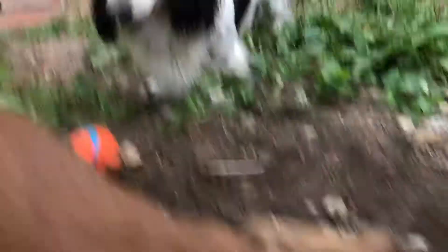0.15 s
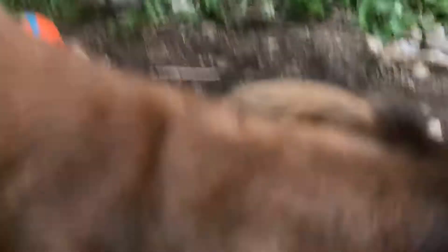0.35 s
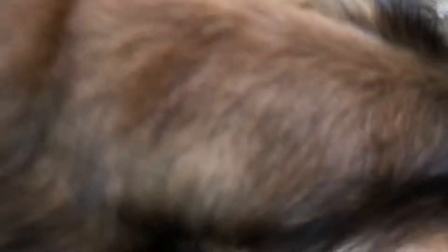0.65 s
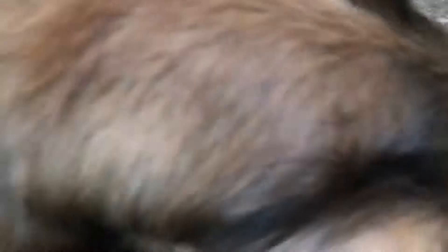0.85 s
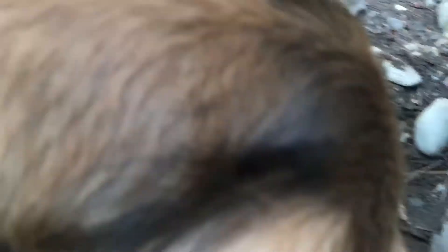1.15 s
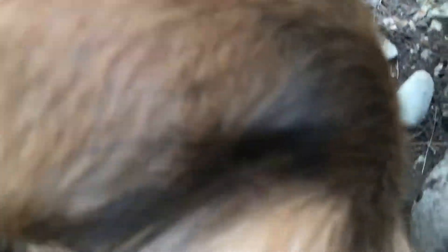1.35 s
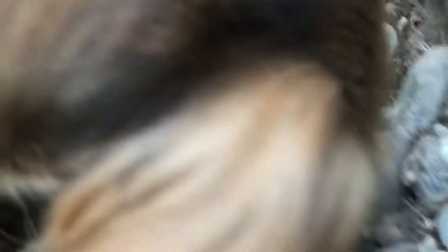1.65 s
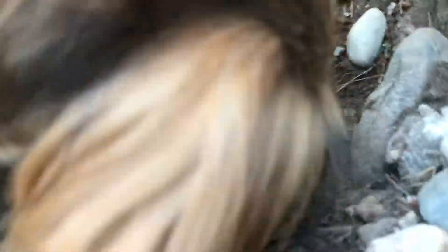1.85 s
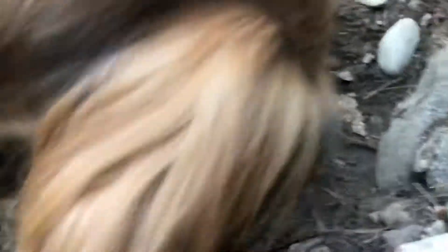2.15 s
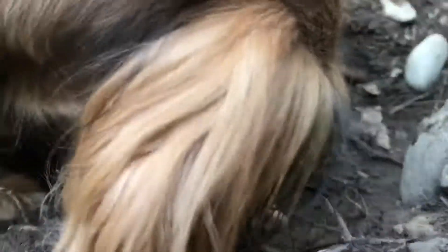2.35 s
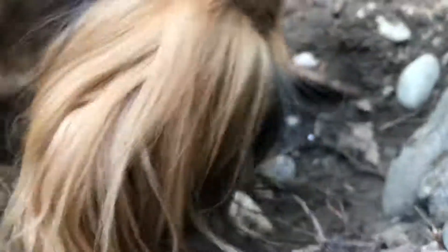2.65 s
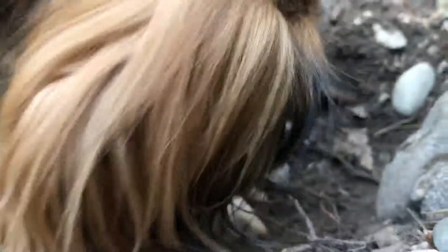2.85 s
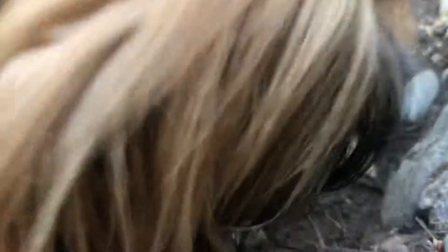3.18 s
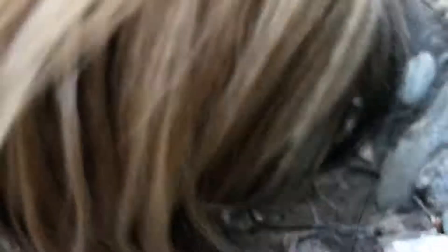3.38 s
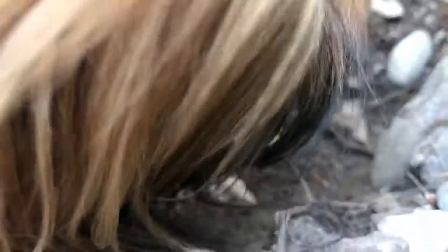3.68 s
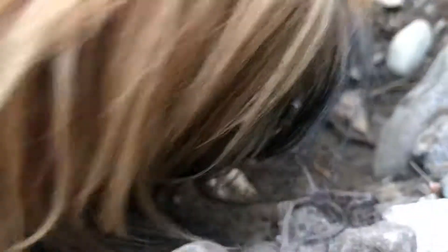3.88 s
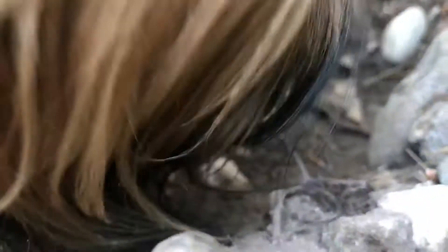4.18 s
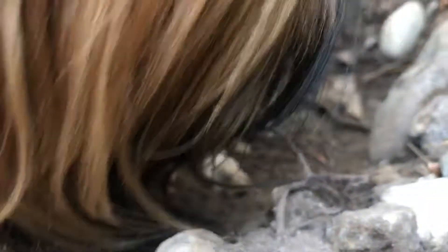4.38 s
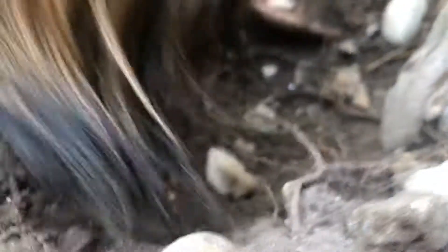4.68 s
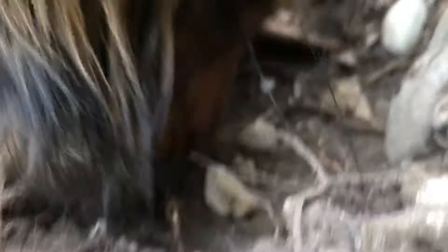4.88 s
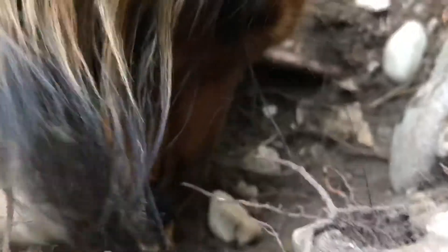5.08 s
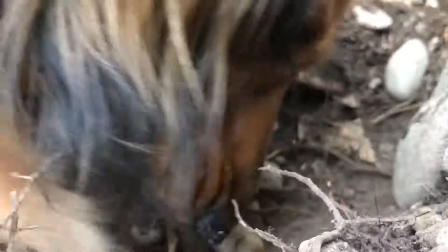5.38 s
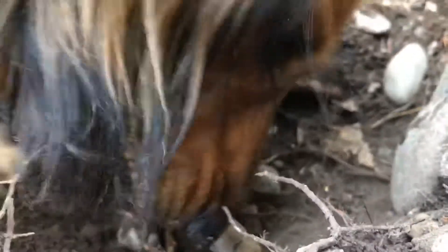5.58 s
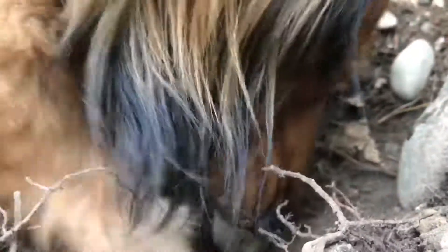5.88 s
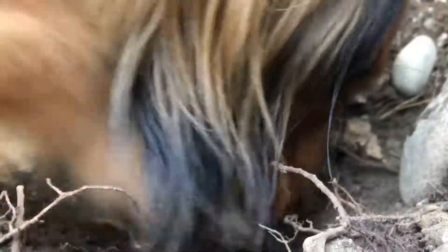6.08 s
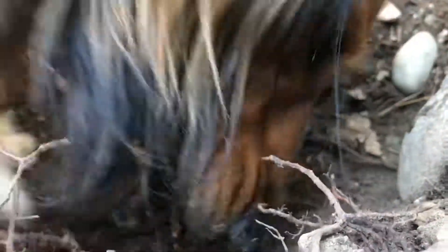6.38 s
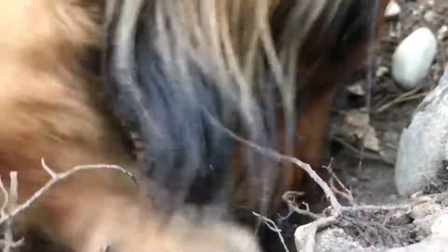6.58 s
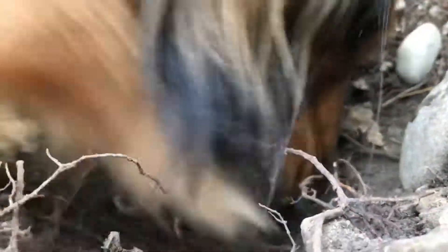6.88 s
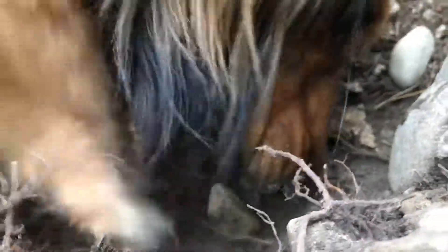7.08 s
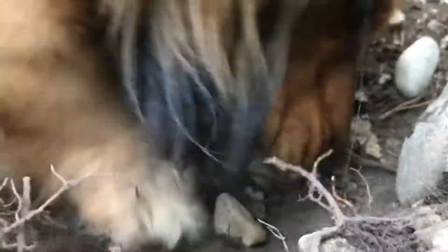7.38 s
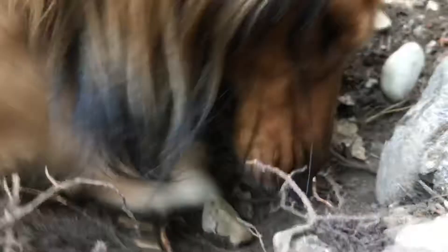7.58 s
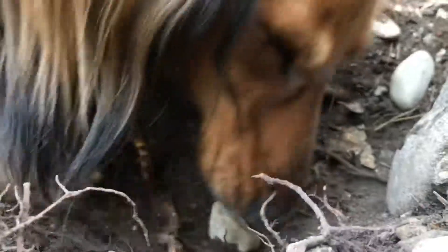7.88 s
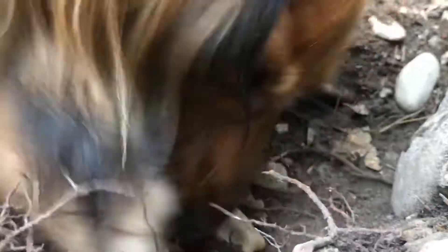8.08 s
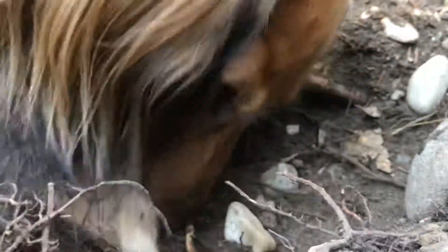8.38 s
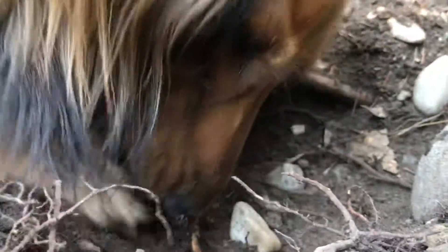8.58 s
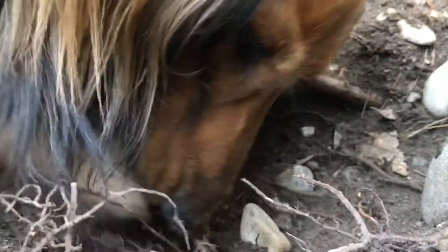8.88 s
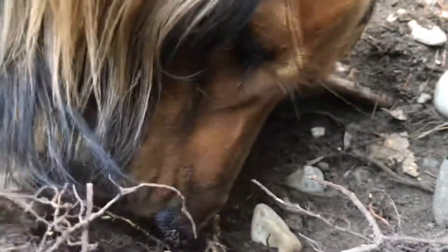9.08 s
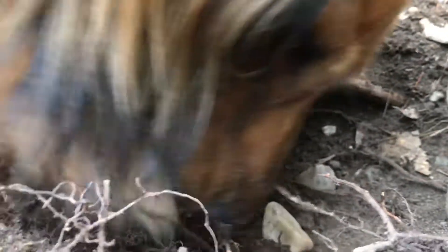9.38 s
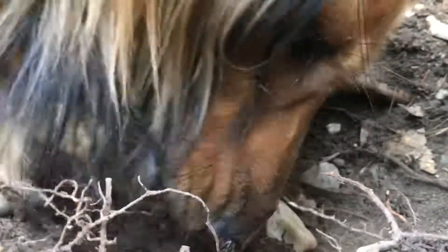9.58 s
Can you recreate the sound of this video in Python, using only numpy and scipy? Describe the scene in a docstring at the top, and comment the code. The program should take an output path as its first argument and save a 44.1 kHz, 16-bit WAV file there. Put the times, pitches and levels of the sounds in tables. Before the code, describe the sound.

Dry, close, single-channel outdoor sound from a phone near the ground. Paws scratch dirt with short rough scrapes, many tiny pebble and twig ticks, and soft hollow thuds on packed earth. The action is busiest in the early and later middle, with a bright stone knock between and a quick snuffling puff afterwards, then mostly quiet. Soft soil rustle, low distant traffic, a wavering motor drone and very faint insects continue behind.

```python
"""A dog noses and paws through dry dirt, twigs and pebbles right by a phone in a yard.
Throughout, filtered noise gives traffic rumble and an insect band, sine harmonics a far motor, grains a soil rustle.
Noise bursts click as stones and twigs from the start; low plants swish in the first second as scrapes begin.
From 1.15 s damped sines thump as paws meet packed soil; a struck pebble rings in many modes at 4.1 s,
and near 7.6 s the nose puffs noise through its resonances."""
import sys
import numpy as np
from scipy import signal
from scipy.fft import rfft, irfft
from scipy.io import wavfile
from scipy.ndimage import uniform_filter1d

SR = 44100
rng = np.random.default_rng(int(sys.argv[2]) if len(sys.argv) > 2 else 0)


def wrap_up_sound(samples):
    """Save the sound to the file named by the first command line argument, as 16-bit audio."""
    columns = np.atleast_2d(samples).T
    # keep every value between -1 and 1, then stretch to whole-number steps
    tamed = np.clip(columns, -1, 1)
    steps = np.round(tamed * 32767).astype(np.int16)
    wavfile.write(sys.argv[1], SR, steps)


N = 429565  # samples


def undb(db):
    """Decibels to amplitude ratio."""
    return 10 ** (np.asarray(db) / 20)


def unit(x):
    """Scale to rms 1."""
    return x / np.sqrt(np.mean(x ** 2))


def band(x, hz, width):
    """Butterworth band-pass around a geometric centre, along the last axis."""
    low_edge = np.sqrt(hz ** 2 + width ** 2 / 4) - width / 2
    high_edge = min(low_edge + width, .45 * SR)
    return signal.sosfilt(signal.butter(2, [low_edge, high_edge], "bandpass", fs=SR, output="sos"), x)


def columns(table):
    """Linear interpolation of each column over time, one value a sample."""
    s, *cols = np.transpose(table)
    return [np.interp(np.arange(N) / SR, s, col) for col in cols]


def walk(rate):
    """Smoothed random modulation of rms 1: levels held 1 / rate s, then averaged twice."""
    hold = int(SR / rate)
    steps = np.repeat(rng.standard_normal(N // hold + 1), hold)
    return unit(uniform_filter1d(uniform_filter1d(steps, hold), hold)[:N])


def add(out, s, sound):
    """Superposition: mix a short sound in at time s."""
    i = int(s * SR)
    out[i:i + len(sound)] += sound[:N - i]


def swell(rise, fall):
    """Raised-cosine envelope with separate rise and fall times in seconds."""
    up = np.hanning(2 * int(rise * SR))[:int(rise * SR)]
    down = np.hanning(2 * int(fall * SR))[int(fall * SR):]
    return np.concatenate([up, down])


def swells(table):
    """Amplitude envelope summed from one swell around each peak."""
    out = np.zeros(N)
    for s, rise, fall, db in table:
        add(out, s - rise, undb(db) * swell(rise, fall))
    return out


# distant traffic, its deep part moving off: time_s, rumble_db, deep_rumble_db
TRAFFIC_LEVELS = [(0, -50.5, -45), (1, -49.5, -50), (1.95, -50, -56.5), (2.5, -50.5, -53), (4.5, -50, -51),
                  (5.9, -49, -58), (7.7, -48.5, -60.5), (8.15, -53, -61), (8.55, -49.5, -63),
                  (9.74, -49.5, -61)]
# spectrum of the yard's background noise: frequency_hz, relative_level_db
YARD_SPECTRUM = [(18, -32), (30, -2), (66, 6), (122, -3), (323, -11.5), (480, -21), (577, -25.5),
                 (772, -29.5), (1700, -31.5), (2970, -30), (4770, -33), (5440, -34.5), (7670, -35.5),
                 (15200, -47.5), (16500, -44)]


def yard(deep_hz=75, split_hz=600, air_db=-69, swell_db=2.0, flicker_db=1.8):
    """Spectral shaping of noise: two rumble bands follow the traffic, the air above wavers slowly."""
    hz = np.maximum(np.arange(N // 2 + 1) * SR / N, 1)
    points = np.array(YARD_SPECTRUM)
    colour_db = np.interp(np.log(hz), np.log(points[:, 0]), points[:, 1])
    spectrum = undb(colour_db) * rfft(rng.standard_normal(N))
    deep_share = 1 / (1 + (hz / deep_hz) ** 6)
    low_share = 1 / (1 + (hz / split_hz) ** 4)
    shares = (deep_share, low_share - deep_share, 1 - low_share)
    deep, rumble, air = (unit(irfft(spectrum * share, N)) for share in shares)
    rumble_db, deep_db = columns(TRAFFIC_LEVELS)
    out = rumble * undb(rumble_db + flicker_db * walk(2.93))
    out = out + deep * undb(deep_db + swell_db * walk(2.52))
    return out + air * undb(air_db + 1.0 * walk(1.744))


MOTOR_HZ = 64.93  # mean firing rate
# strongest multiples of the firing rate: time_s, second_multiple_db, fourth_multiple_db
MOTOR_LEVELS = [(0, -50.5, -66), (1.8, -52.5, -64), (2.05, -59, -64), (2.5, -50.5, -69), (2.95, -51, -58),
                (3.8, -51, -57), (4.15, -52, -63), (4.6, -52.5, -67.5), (6.1, -55, -61), (6.43, -65, -67.5),
                (6.7, -51, -60), (8.14, -60, -69.5), (8.46, -53, -67.5), (9.28, -61, -71), (9.74, -53, -65)]
# other multiples: multiple_number, level_over_second_multiple_db
MOTOR_OTHER_MULTIPLES = [(1, -11.5), (3, -17.5), (5, -16), (6, -23.5), (9, -21)]


def motor(waver_db=2.0, drift=0.00502):
    """Harmonic series on the firing rate, each multiple wavering as it comes through moving air."""
    phase = 2 * np.pi * np.cumsum(MOTOR_HZ * (1 + drift * walk(12))) / SR
    second_db, fourth_db = columns(MOTOR_LEVELS)
    lines = [(2, second_db), (4, fourth_db)]
    lines += [(k, second_db + db) for k, db in MOTOR_OTHER_MULTIPLES]
    out = 0
    for k, db in lines:
        tone = np.sqrt(2) * np.sin(k * phase + 2 * np.pi * rng.random())
        out = out + undb(db + waver_db * walk(14)) * tone
    return out


def drone(hz=59, width_hz=6, level_db=-59):
    """Narrow-band noise wavers like an unsteady tone: a low drone under the traffic."""
    return undb(level_db) * unit(band(rng.standard_normal(N), hz, width_hz))


def insects(hz=5450, width_hz=520, level_db=-76.5):
    """Incoherent sum of many callers: a far chorus merged into one narrow hiss."""
    return undb(level_db + 0.5 * walk(2.1)) * unit(band(rng.standard_normal(N), hz, width_hz))


# faint rustle of loose soil and leaves: time_s, level_db before the trim, tilt_db_per_octave
RUSTLE = [(0.0, -67, -2.5), (0.24, -65.5, -1.5), (0.65, -61.5, 0), (1.52, -66, -0.5), (1.71, -64, 0),
          (1.95, -59.5, 0.5), (2.44, -62.5, 1), (2.71, -59.5, -0.5), (3.31, -65, 0), (4.01, -69, -1),
          (4.2, -60, 1), (4.5, -66, -1), (5.89, -64.5, 0), (6.02, -70.5, 0), (7.05, -66.5, 0.5),
          (7.46, -56.5, -1.5), (7.89, -64, -0.5), (8.33, -65, 1), (8.71, -69, -1), (9.74, -68, -0.5)]
# paw and nose scrapes: peak_s, rise_s, fall_s, level_db before the trim, tilt_db_per_octave
SCRAPE_EVENTS = [(.532, 0.04, .033, -66, 1), (1.144, .027, 0.07, -52, -1), (1.42, .011, .021, -56.5, 8),
                 (1.594, 0.013, 0.0093, -55, -11), (1.825, 0.096, 0.03, -55, -0.5),
                 (1.907, .054, .014, -57, 3), (2.066, .014, 0.0062, -49, 0), (2.126, .02, 0.023, -56, 3.5),
                 (2.238, 0.016, 0.042, -46.5, 1.5), (2.548, 0.08, 0.14, -48, 1),
                 (2.681, .011, .015, -56, 0), (2.752, .011, .009, -63, -3),
                 (2.872, 0.026, .026, -56.5, -3.5), (2.999, 0.018, 0.017, -61, -5),
                 (3.055, 0.023, .024, -56, -3), (3.314, 0.0098, .014, -47.5, 5),
                 (3.349, 0.01, 0.02, -53, 6.5), (3.641, .0084, 0.02, -62, 2),
                 (3.721, .035, .025, -55.5, -1), (3.757, 0.017, 0.068, -60.5, -0.5),
                 (3.849, .034, 0.026, -56.5, 0), (4.007, .01, 0.082, -60.5, -5),
                 (4.073, .025, 0.012, -57, -7), (4.116, .01, .021, -46.5, -1.5),
                 (4.47, 0.27, .05, -67.5, 2), (4.774, 0.013, .034, -62, 1.5),
                 (4.852, 0.046, 0.011, -54.5, -3), (4.905, 0.0077, 0.0085, -60, 1),
                 (5.061, 0.031, .058, -62, 4.5), (5.117, 0.0092, 0.031, -42, 3.5),
                 (5.551, 0.19, 0.086, -60.5, -1.5), (5.851, 0.01, 0.0062, -63, -8),
                 (5.927, .029, 0.048, -60, -4), (6.008, 0.03, 0.063, -56.5, -5),
                 (6.312, .085, .093, -53.5, 0), (6.682, 0.024, 0.088, -43, 1), (6.797, .045, .022, -58, 1),
                 (7.089, 0.06, 0.071, -51, -1), (7.237, 0.031, 0.051, -60, 4),
                 (7.36, 0.022, 0.017, -48, -1.5), (7.397, 0.019, 0.023, -47.5, -2),
                 (7.449, .027, .012, -55, 2), (7.524, .05, .029, -62, 3.5), (7.625, 0.066, .043, -55, -0.5),
                 (7.777, 0.02, 0.013, -63, 6), (7.87, .011, 0.022, -58.5, 4), (8.1, .06, 0.037, -65.5, -5),
                 (8.348, 0.056, .066, -63.5, -1), (8.69, 0.039, .024, -57, -2.5),
                 (9.089, 0.12, 0.075, -63, -1), (9.222, .011, .018, -63, -3),
                 (9.515, 0.036, 0.18, -58.5, -1)]
# centres of the dull, low, middle and bright grit ranges: frequency_hz
GRIT_CENTRES = [950, 1900, 4600, 10500]
# colour of the rustle in those four ranges: added_level_db
RUSTLE_COLOUR = [-2, -1.5, -2, -2.5]
# colour of the scrapes in those four ranges: added_level_db
SCRAPE_COLOUR = [-3.5, -2, -0.5, -3]


def grains(per_s, spread_db):
    """Granular impulse train: slips of uneven size at random times."""
    size = undb(spread_db * np.minimum(rng.exponential(size=N), 3))
    return unit((rng.random(N) < per_s / SR) * rng.standard_normal(N) * size)


def grit(per_s=1600, spread_db=3.0, rustle_burst_db=1.0, scrape_burst_db=3.0, patch_db=1.5,
         hiss=.45, own=0.57, edge_db=-4, trim_db=-4):
    """Stick-slip friction of grains, in a faint rustle and hard scrapes, partly independent by half octave."""
    scrape = np.zeros((len(GRIT_CENTRES), N))
    octaves = np.log2(np.array(GRIT_CENTRES) / 3000)  # tilts pivot at 3 kHz
    for s, rise, fall, db, tilt in SCRAPE_EVENTS:
        for row, gain in zip(scrape, undb(db + tilt * octaves + SCRAPE_COLOUR)):
            add(row, s - rise, gain * swell(rise, fall))
    rustle_db, tilt = columns(RUSTLE)
    rustle = undb(rustle_db + np.outer(octaves, tilt) + np.c_[RUSTLE_COLOUR])
    # soil gives way in jerks, harder under the paw
    scrape = scrape * unit(undb(scrape_burst_db * walk(220)))
    rustle = rustle * unit(undb(rustle_burst_db * walk(40)))
    push = scrape + rustle
    shared = grains(per_s, spread_db) + hiss * rng.standard_normal(N)
    out = 0
    for hz in 680 * 2 ** np.arange(0, 4.6, .5):
        # geometric blend between the two nearest ranges
        place = np.interp(np.log(hz), np.log(GRIT_CENTRES), np.arange(len(GRIT_CENTRES)))
        k = min(int(place), len(GRIT_CENTRES) - 2)
        level = push[k] ** (k + 1 - place) * push[k + 1] ** (place - k)
        if not GRIT_CENTRES[0] <= hz <= 1.1 * GRIT_CENTRES[-1]:
            level = level * undb(edge_db)  # weaker at both ends of the range
        # leaves, twigs and clods of different size take turns, so the colour comes in patches
        patches = undb(patch_db * walk(35))
        out = out + level * patches * unit(band(shared + own * grains(per_s, spread_db), hz, .36 * hz))
    return undb(trim_db) * out


def small_ticks(per_s=5.9, level_db=-57, spread_db=5, knock_db=-7.5, treble_db=-8.5, colour_db=7.5):
    """Random impacts of rolling grit: rows like the click table, louder where the rustle is louder."""
    count = int(per_s * N / SR)
    s = rng.random(count) * N / SR
    size, dull, bright = rng.standard_normal((3, count))
    rustle_db = np.interp(s, *np.transpose(RUSTLE)[:2])
    return np.transpose([s, level_db + rustle_db - rustle_db.mean() + spread_db * size,
                         knock_db + colour_db * dull, treble_db + colour_db * bright])


# clearer stone and twig clicks: start_s, body_level_db, knock_over_body_db, treble_over_body_db
CLICK_EVENTS = [(0.2104, -48, -10, -12), (0.4783, -41, -14, -2.5), (0.5352, -45, -21, -11),
                (0.7776, -51.5, 5.5, 3), (0.8475, -51, -17, -6), (1.1014, -47.5, 0, 3),
                (1.1358, -33, -11, -5), (1.1634, -48, -15, 3), (1.1814, -42, -7, -18),
                (1.2835, -40.5, -29, -3), (1.2984, -46.5, -8, -14), (1.4117, -38, -5, 1.5),
                (1.4284, -55, -6, -5), (1.5908, -48, -4, -8), (1.6571, -54, -14, -12),
                (1.7479, -42.5, -8, -10), (1.7814, -39.5, -10, -6), (1.8183, -34, -21, -5),
                (1.8274, -36, 0, -19), (1.9949, -47, -17, -8), (2.0637, -40.5, 3, -3),
                (2.1101, -49, -14, -9), (2.1291, -40, -27, -10), (2.2278, -35, -3.5, -5),
                (2.3745, -50, -14, -7), (2.4264, -44.5, -18, -6), (2.5057, -42.5, -22, -6),
                (2.6414, -35.5, -17, -16), (2.6668, -32, -23, -7), (2.6834, -37, -15, -2),
                (2.6898, -32, -23, 2.5), (2.7102, -23.5, -23, -4.5), (2.7234, -42, -18, -21),
                (2.7412, -43, -16, -18), (2.7474, -41, -10, -12), (2.7586, -40, -2, -15),
                (2.7975, -50, -10, -9), (2.8174, -44.5, -29, -8), (2.8719, -39.5, -18, -13),
                (2.9297, -42.5, -16, -9), (2.9946, -41.5, -19, -19), (3.028, -44, -9, -13),
                (3.1472, -52, -12, -9), (3.3059, -37.5, -16, -10), (3.3413, -49, -7, 4),
                (3.6296, -48, -18, -10), (3.6426, -43, -16, -13), (3.7174, -41, -9, -14),
                (3.8407, -39, -22, -7), (3.9993, -38.5, -1, -8.5), (4.0257, -45, -13, -22),
                (4.0741, -44, -12, -12), (4.1769, -46.5, -16, -13), (4.345, -49, -3, -14),
                (4.4084, -48, -4, -9), (4.4338, -48, -8, -10), (4.577, -51, -13, -14),
                (4.7037, -52, -9, -12), (4.7944, -55, -12, 3), (4.8135, -43, -11, -3),
                (4.8376, -46, -1, -9), (4.8464, -43, -12, -19), (4.8993, -41.5, -15, -9),
                (5.0419, -44, -13, -7), (5.0823, -45.5, -7, 3), (5.1123, -29, -18, -11),
                (5.2874, -42.5, -16, -8), (5.4745, -47.5, -5, -8), (5.6885, -41, -19, -12),
                (5.8092, -35.5, -18, -12), (5.8426, -40, -2.5, -13), (5.894, -48, -5, -5),
                (5.9214, -48, -4, -12), (5.9753, -45, 0, -5), (6.0038, -34, -0.5, -10),
                (6.2781, -42, -11, -5), (6.2891, -35, -8, -12), (6.6293, -41.5, -14, -8),
                (6.6722, -34, -21, -1), (6.6767, -25, -8.5, -3.5), (6.6904, -32, -4, -12),
                (6.7131, -33, -12, -13), (6.796, -48, -9, -3), (7.0319, -47.5, 8.5, -5),
                (7.0564, -45, 1, 0), (7.0638, -30, -1, -11), (7.0833, -28.5, -10, -10),
                (7.1132, -38, -6, -10), (7.1334, -45, -2, -6), (7.1407, -38, -17, -5.5),
                (7.3018, -45, -3, -17), (7.3542, -37.5, -3, -1.5), (7.3966, -34.5, -14, -11),
                (7.433, -43, -3, -4), (7.451, -34, -6.5, -9), (7.4949, -40, -2, -1),
                (7.7807, -37.5, -5, -8), (7.8635, -50, 3, -1), (8.6842, -40.5, -15, -9),
                (8.985, -54, -9, -12), (9.2155, -50, -5, -8), (9.4948, -48, -9, -2),
                (9.5153, -42.5, -0.5, -16), (9.5537, -45, -2, -14)]
# click bands in the order body, knock, crack, snap: centre_hz, width_hz
CLICK_RANGES = [(2450, 4170), (1020, 1170), (6350, 5600), (10700, 13000)]


def clicks(rise_share=0.072, t60_s=0.0094, t60_per_knock_db=.012, crack_db=1.5, snap_db=-1.5):
    """Impact damping: each contact is a short crackle; duller ones build slower and ring longer."""
    out, t = np.zeros(N), np.arange(SR // 16) / SR
    events = np.vstack([CLICK_EVENTS, small_ticks()])
    s, body_db, knock_db, treble_db = np.transpose(events)[:, :, None]
    t60 = t60_s * np.exp(t60_per_knock_db * knock_db)
    attack = (1 - np.exp(-t / (rise_share * t60))) ** 2
    noise = rng.standard_normal((len(s), len(t))) * attack
    # crack and snap share the treble
    band_levels = [0, knock_db, treble_db + crack_db, treble_db + snap_db]
    sound = 0
    for (hz, width), db in zip(CLICK_RANGES, band_levels):
        ring = t60 * (2700 / hz) ** .3  # lower bands ring longer
        crackle = band(noise * 1000 ** (-t / ring), hz, width)
        energy = np.sum(crackle ** 2, axis=1, keepdims=True) / SR
        sound = sound + undb(body_db + db) * crackle * np.sqrt((0.00024 + ring / 14) / energy)
    for start, row in zip(s[:, 0], sound):
        add(out, start, row)
    return out


# low plants brushed a little way off: peak_s, rise_s, fall_s, level_db
SWISH_EVENTS = [(.24, .03, .04, -62.5), (.37, .08, .2, -65), (.7, .12, .08, -67), (.86, .05, .03, -60)]


def swishes(patch_db=3.5, hz=1350, width_hz=720):
    """Friction noise: leaves rub in dull, patchy sweeps."""
    rub = band(rng.standard_normal(N), hz, width_hz)
    return swells(SWISH_EVENTS) * unit(undb(patch_db * walk(60.4)) * rub)


# paw thumps on packed soil: start_s, deep_level_db, deep_pitch_hz, hollow_level_db, hollow_pitch_hz, deep_t60_s
THUMP_EVENTS = [(1.15, -45, 153, -45.5, 198, 0.074), (1.596, -28, 82, -41, 253, 0.051),
                (1.705, -36.5, 70, -66, 215, 0.058), (1.77, -40, 70.0, -56, 278, 0.05),
                (1.827, -35, 113, -36, 260, 0.047), (2.062, -37, 191, -32.5, 418, 0.053),
                (2.23, -34, 102, -37.5, 333, 0.03), (2.242, -38, 72.7, -47, 270, 0.026),
                (2.756, -38, 101, -37, 260, 0.025), (2.929, -46, 128, -43, 208, 0.046),
                (4.019, -41, 184, -41, 202, 0.046), (4.069, -38, 144, -40, 278, 0.037),
                (4.351, -42, 128, -43, 220, 0.066), (5.105, -43.5, 143, -50, 214, 0.16),
                (5.97, -38, 70.0, -46, 202, 0.051), (6.002, -30.5, 85, -35.5, 201, 0.074),
                (6.29, -41, 90.5, -42, 211, 0.11), (6.696, -45, 200, -33.5, 261, 0.053),
                (6.733, -35.5, 209, -49, 202, 0.027), (7.063, -36, 186, -35.5, 202, 0.067),
                (7.089, -38, 157, -40.5, 388, 0.026), (7.14, -37, 179, -42, 202, 0.042),
                (7.392, -42, 173, -37.5, 229, 0.079), (7.452, -47, 199, -32.5, 243, 0.017),
                (7.494, -38, 157, -42, 290, 0.063), (7.52, -39, 103, -49, 226, 0.071),
                (7.71, -50, 72, -51, 225, 0.067), (7.771, -50, 197, -39.5, 206, 0.046),
                (7.865, -39, 159, -42.5, 202, 0.034), (8.679, -44, 174, -53, 333, 0.071)]


def thumps(rise_s=0.0026, upper_share=0.95, deep_late_s=0.0031,
           crumble_db=-6, crumble_hz=300, crumble_width=260):
    """Damped oscillation: the soil gives a few cycles, deep and hollow, blurred by crumbling clods."""
    out, t = np.zeros(N), np.arange(SR // 5) / SR
    crumble = unit(band(rng.standard_normal((len(THUMP_EVENTS), len(t))), crumble_hz, crumble_width))
    for (s, deep_db, deep_hz, hollow_db, hollow_hz, t60), clods in zip(THUMP_EVENTS, crumble):
        deep = np.sqrt(2) * np.sin(2 * np.pi * deep_hz * t)
        hollow = np.sqrt(2) * np.sin(2 * np.pi * hollow_hz * t) + undb(crumble_db) * clods
        # the deep swing arrives a little late, through the ground
        parts = ((deep_db, deep, t60, deep_late_s), (hollow_db, hollow, upper_share * t60, 0))
        for db, swing, ring, late in parts:
            envelope = (1 - np.exp(-t / rise_s)) ** 2 * 1000 ** (-t / ring)
            add(out, s + late, undb(db) * swing * envelope / envelope.max())
    return out


# modes of a pebble struck hard against rock: pitch_hz, level_over_knock_db, t60_s
PEBBLE_MODES = [(650, -6, 0.014), (1860, -3.5, 0.0067), (2260, -21, 0.0088), (3450, -9, 0.0061),
                (4040, -0.5, 0.0048), (5100, -11, 0.0068), (6030, -5, 0.0044), (6930, 2.5, 0.0047),
                (8300, 1, 0.0032), (9750, -5, 0.0037), (11400, 3.5, 0.0047), (12500, 6.5, 0.0035),
                (13700, -2, 0.0052), (15500, -4, 0.0045)]


def knock(start_s=4.1154, level_db=-21.5, rise_s=0.00022, late_cycles=0.58):
    """Modal synthesis: the pebble's modes ring briefly, the low ones building up later."""
    out, t = np.zeros(N), np.arange(SR // 16) / SR
    for hz, db, t60 in PEBBLE_MODES:
        attack = (1 - np.exp(-t / (rise_s + late_cycles / hz))) ** 2
        ring = attack * 1000 ** (-t / t60)
        tone = np.sin(2 * np.pi * (hz * t + rng.random()))
        add(out, start_s, undb(level_db + db) * ring / ring.max() * tone)
    return out


# puffs of air through the nose: peak_s, rise_s, fall_s, level_db
SNORT_EVENTS = [(7.53, .04, 0.043, -60), (7.625, 0.066, 0.045, -49), (7.7, 0.046, .05, -62)]
# resonances of the nose passages: centre_hz, width_hz, relative_level_db
NOSE_RESONANCES = [(990, 450, 0), (2980, 700, 0), (4400, 1300, -7), (6900, 1500, -2.5), (9800, 1800, -5)]


def snorts(flutter_db=1.5):
    """Source and filter: turbulent air coloured by the nose passages."""
    air = rng.standard_normal(N)
    breath = unit(sum(undb(db) * unit(band(air, hz, width)) for hz, width, db in NOSE_RESONANCES))
    return swells(SNORT_EVENTS) * undb(flutter_db * walk(150)) * breath


def scene():
    """Linear superposition of all sources, as one channel."""
    background = yard() + motor() + drone() + insects()
    dog = grit() + clicks() + thumps() + knock() + snorts()
    return (background + dog + swishes())[None]


# anti-resonances of the phone's port: centre_hz, width_hz, gain_db
PORT_DIPS = [(7810, 910, -5), (10560, 750, -5)]


def record(dry, low_hz=40.5, top_hz=15900):
    """Band-limiting: the phone drops the deepest bass, dips at its port and cuts the top steeply."""
    out = signal.sosfilt(signal.butter(3, low_hz, "highpass", fs=SR, output="sos"), dry)
    for hz, width, db in PORT_DIPS:
        out = out - (1 - undb(db)) * signal.lfilter(*signal.iirpeak(hz, hz / width, SR), out)
    return signal.sosfilt(signal.ellip(10, .2, 70, top_hz, fs=SR, output="sos"), out)


dry = scene()
out = record(dry)
wrap_up_sound(out)
```